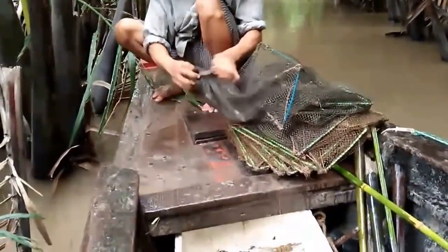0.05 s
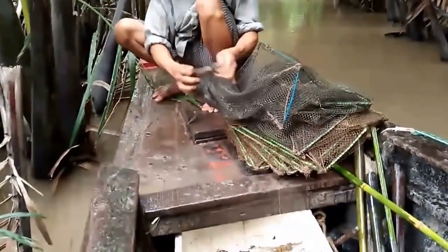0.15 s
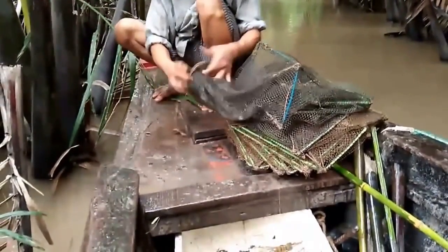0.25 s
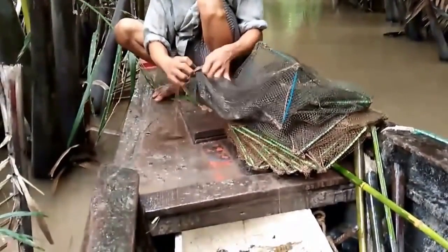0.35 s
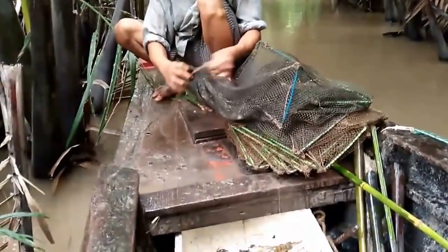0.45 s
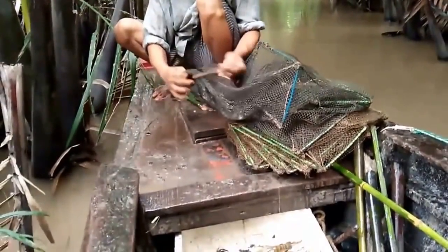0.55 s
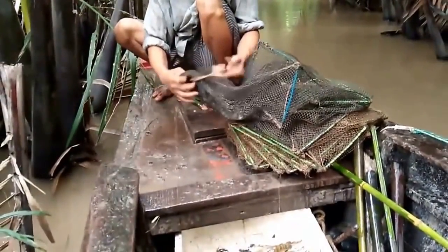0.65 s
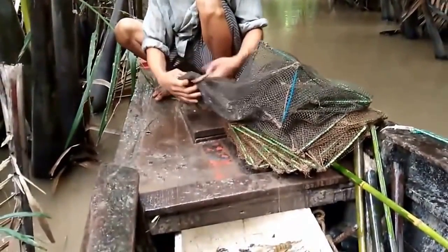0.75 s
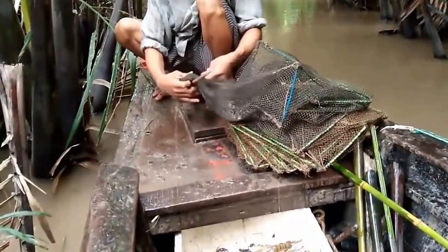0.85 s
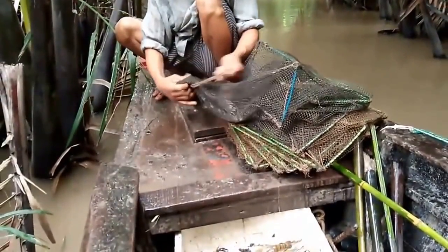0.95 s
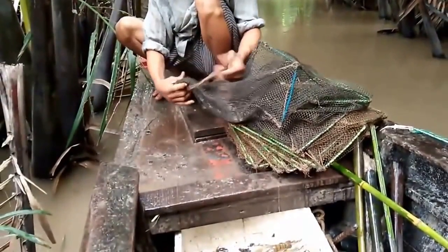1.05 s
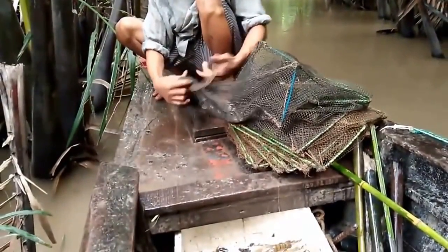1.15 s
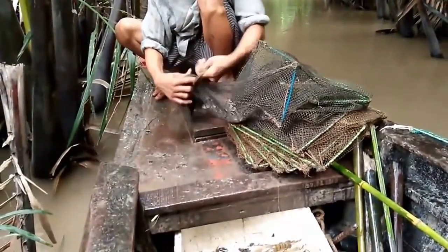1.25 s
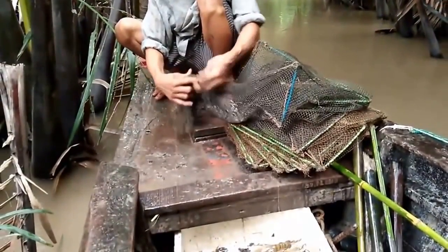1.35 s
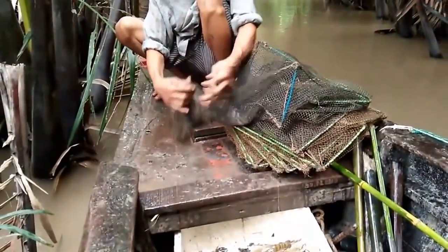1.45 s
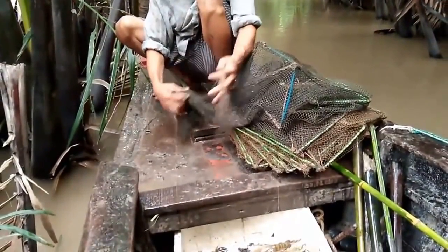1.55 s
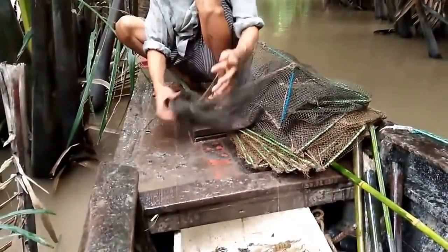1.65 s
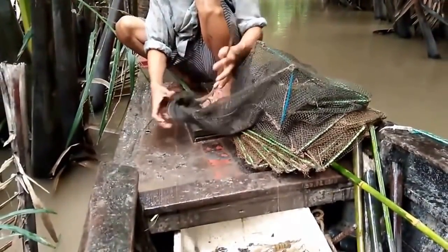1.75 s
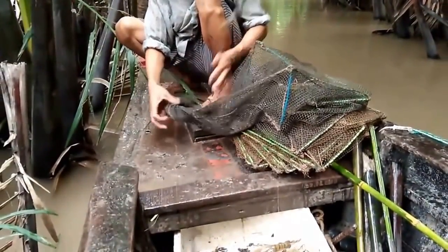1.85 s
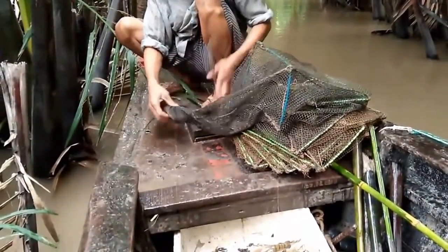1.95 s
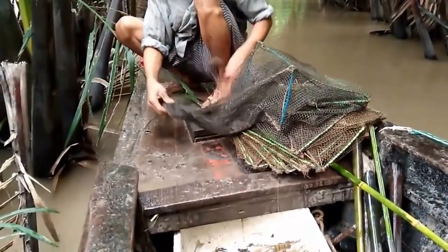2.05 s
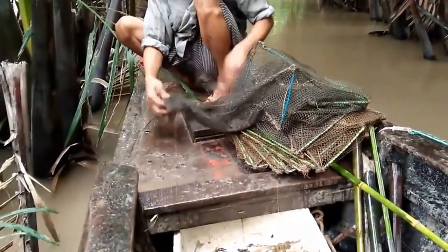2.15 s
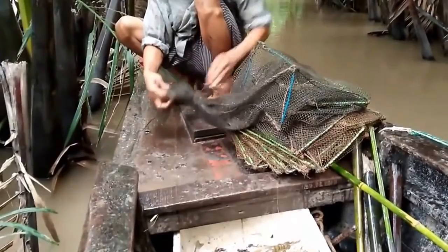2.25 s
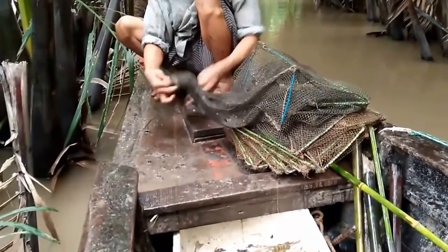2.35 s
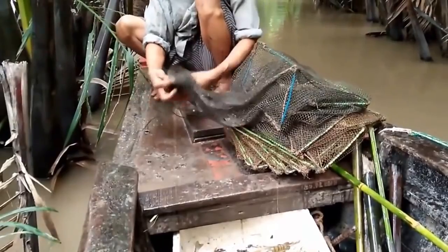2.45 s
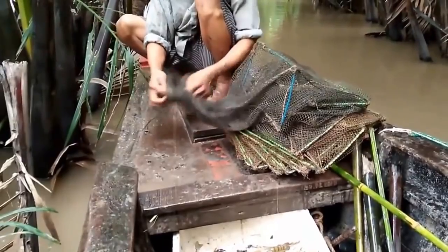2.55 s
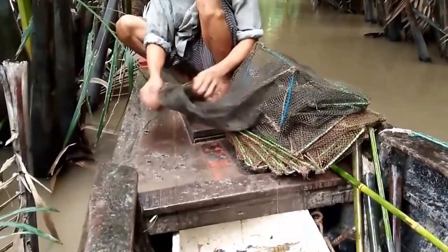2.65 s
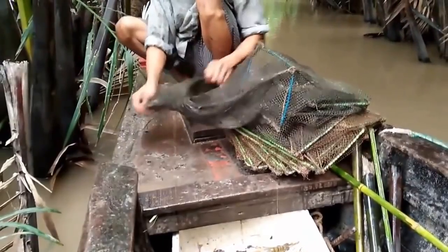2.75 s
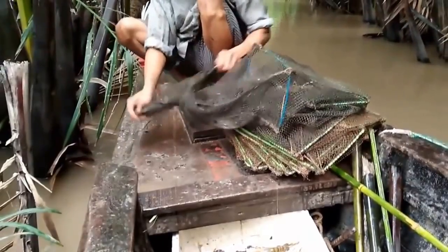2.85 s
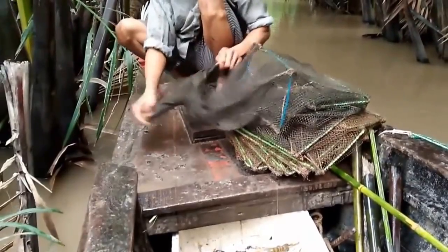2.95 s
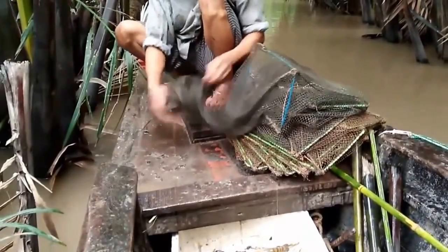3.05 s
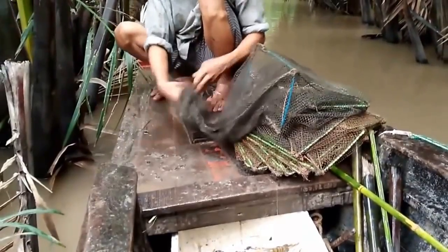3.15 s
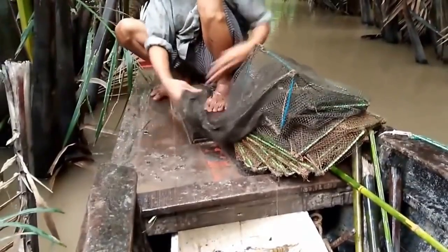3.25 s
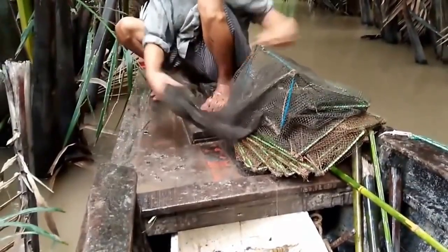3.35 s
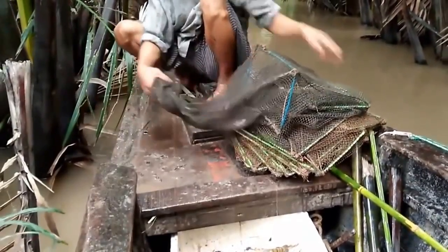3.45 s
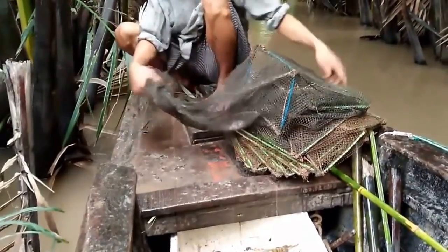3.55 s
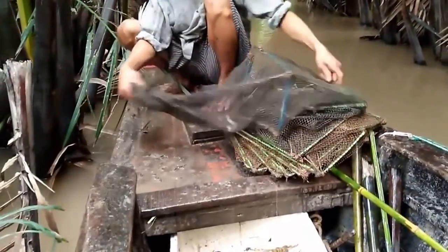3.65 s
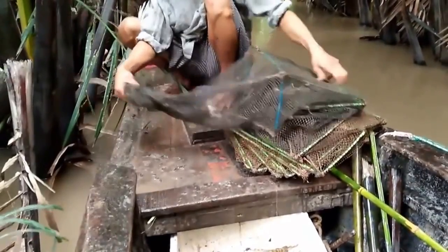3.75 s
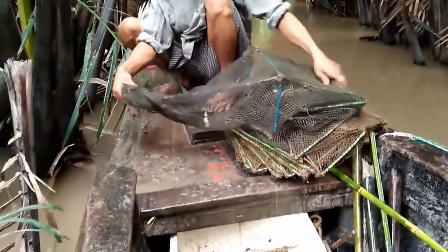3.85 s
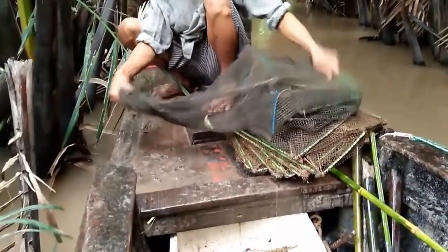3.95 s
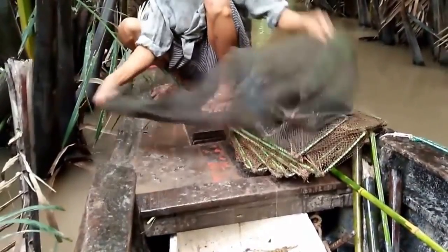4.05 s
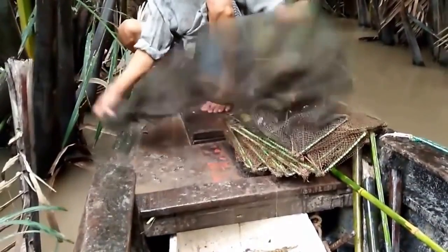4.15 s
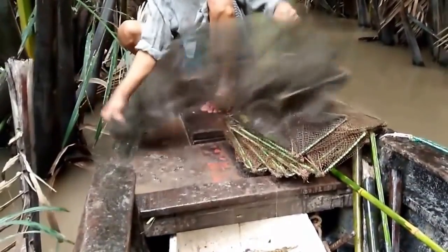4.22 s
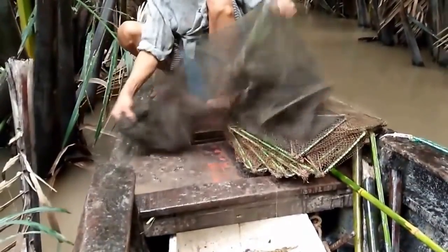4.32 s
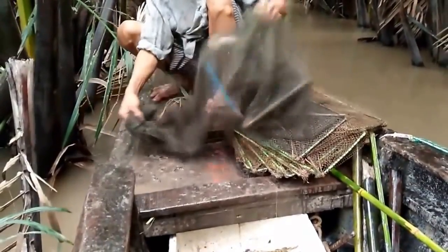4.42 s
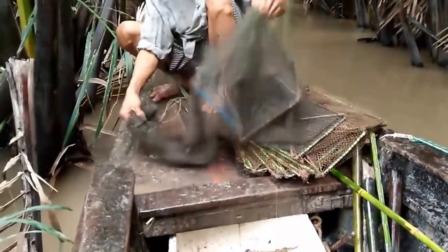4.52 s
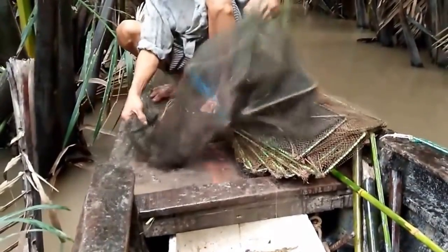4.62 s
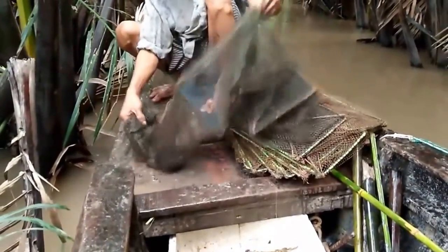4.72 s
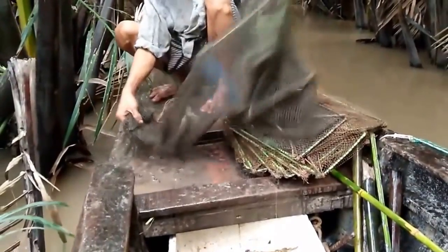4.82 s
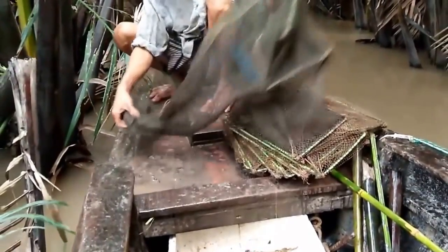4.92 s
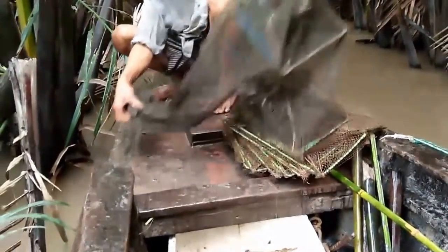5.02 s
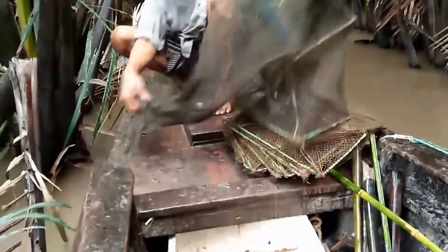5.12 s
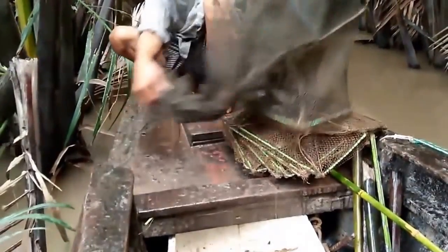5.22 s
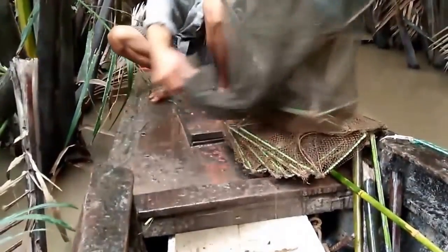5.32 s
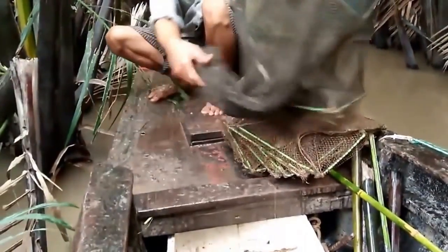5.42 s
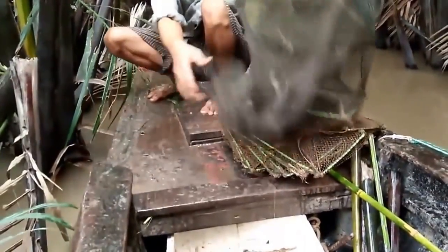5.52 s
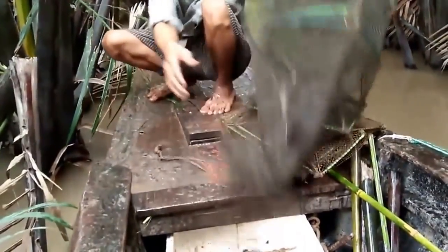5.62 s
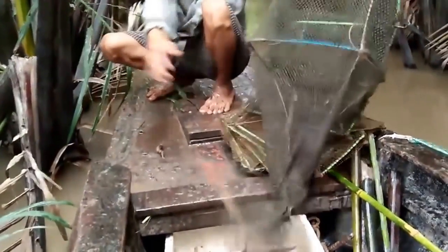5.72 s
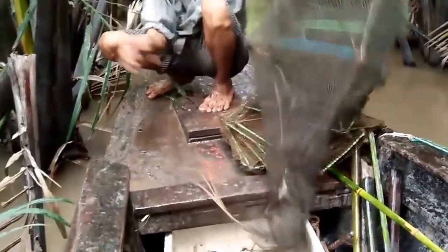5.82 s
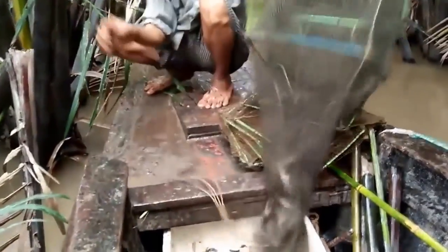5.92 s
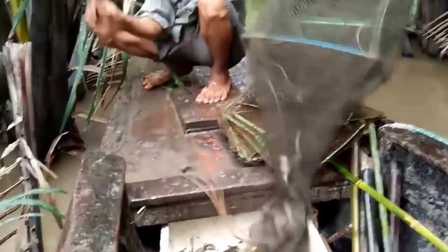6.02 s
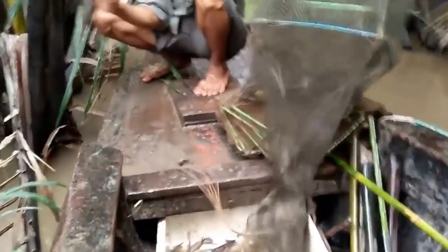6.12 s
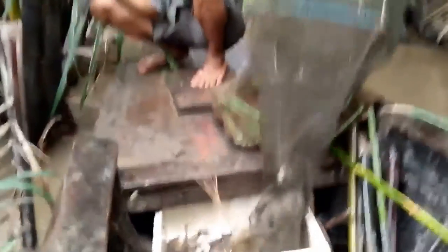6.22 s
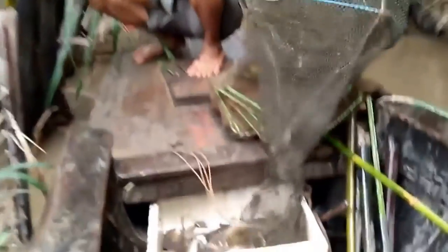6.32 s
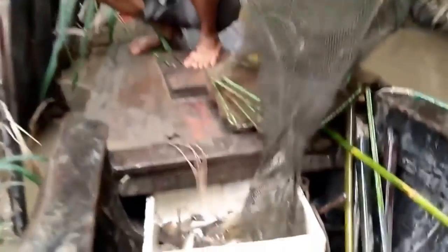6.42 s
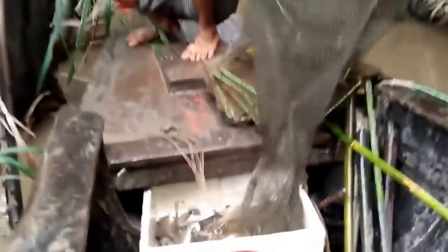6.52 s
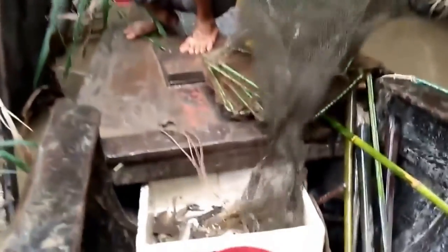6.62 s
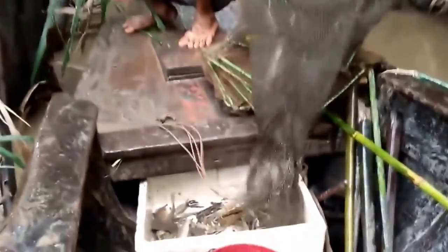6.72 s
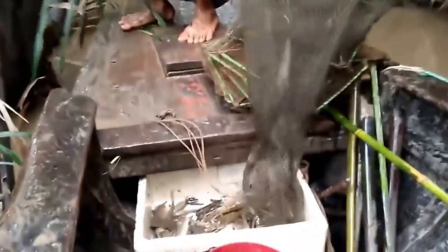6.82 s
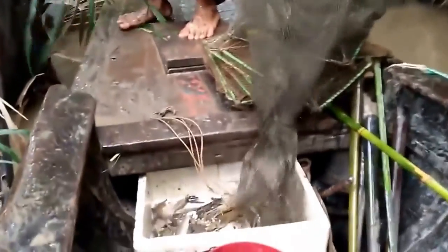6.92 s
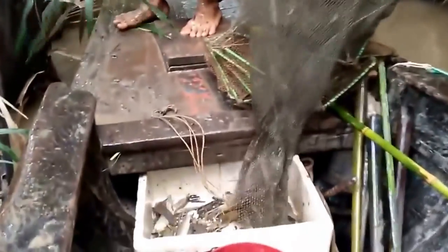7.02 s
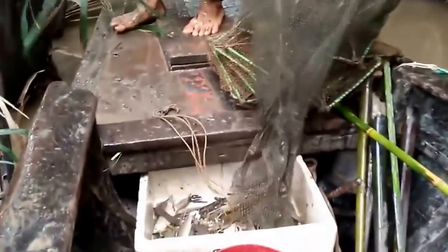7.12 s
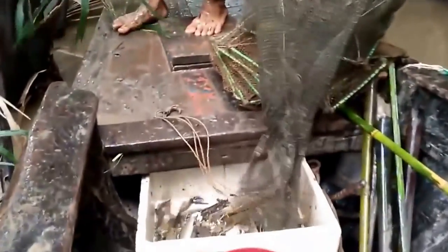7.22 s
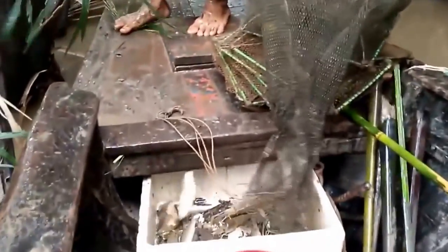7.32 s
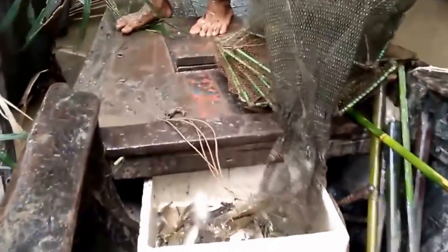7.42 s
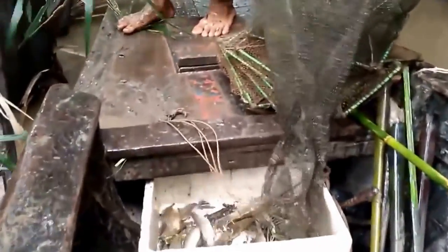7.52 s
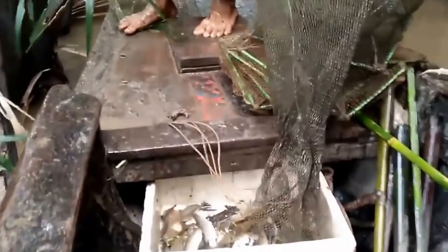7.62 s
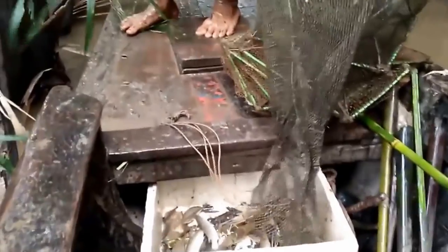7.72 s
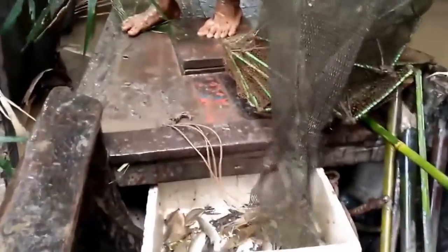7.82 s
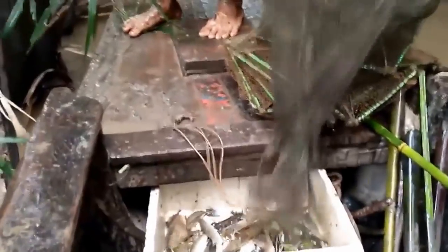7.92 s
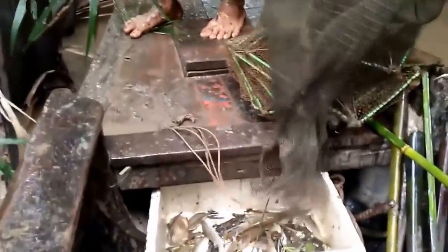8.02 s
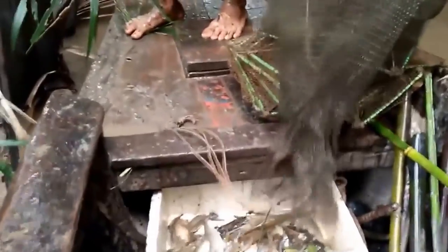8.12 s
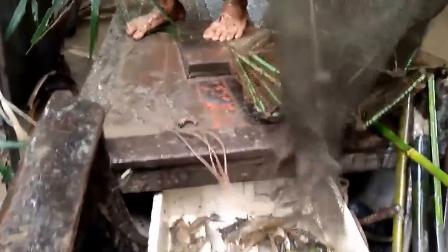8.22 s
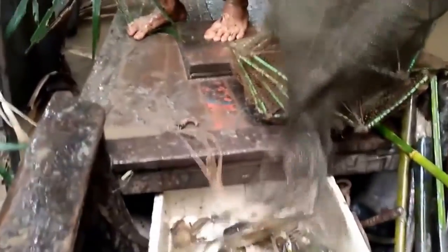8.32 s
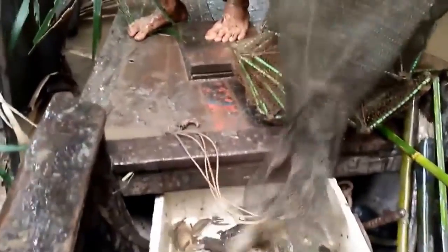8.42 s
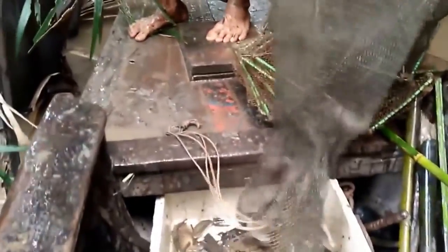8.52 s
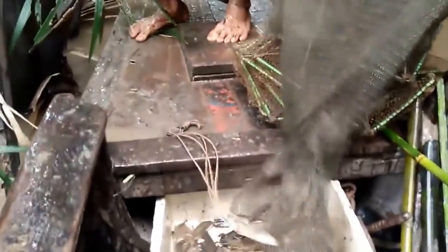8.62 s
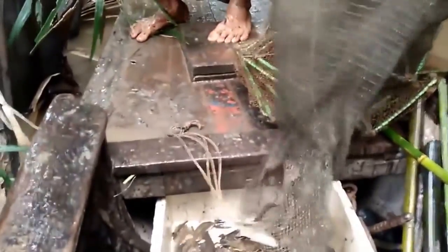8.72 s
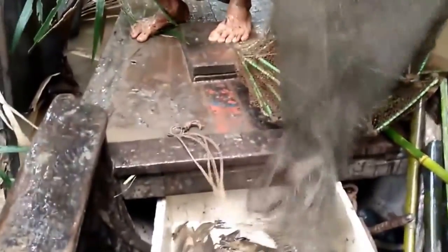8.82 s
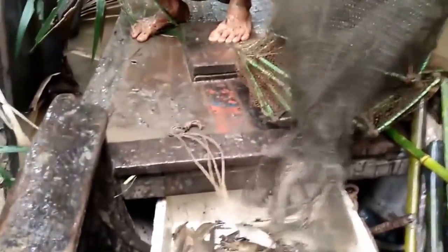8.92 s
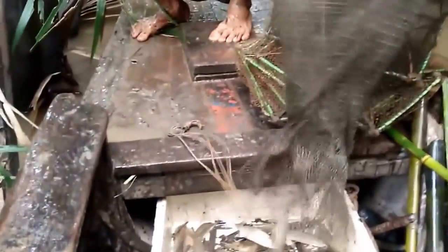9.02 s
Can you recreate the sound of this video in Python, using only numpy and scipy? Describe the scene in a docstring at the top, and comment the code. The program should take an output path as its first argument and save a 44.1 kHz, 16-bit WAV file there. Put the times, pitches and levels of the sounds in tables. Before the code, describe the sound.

Close, dry outdoor sound over a steady low rumble, soft wash and thin high hiss. From 0 to 3 s, wet netting is handled quietly: short, fine crackling rubs near 0.6, 0.9 and 1.9, small wire clicks, and faint dull knocks. Around 3.4-3.7 rustling grows with several crisp snaps. At 4.3 a sharp, bright snap marks the lift, followed by swishing mesh and repeated frame clatter until 5.5. From 5.8 the catch tumbles: hollow slaps cluster at 5.9-6.1 with a dense wet crunch at 6.0, then rustling and snaps, and strong soft plops near 6.65-6.8. Around 7.0-7.5 two bright mesh shakes overlay a half-second scraping pour of shells, ending with a hard knock and snap. Lighter rustles and clicks follow until 8.5, then another crunching shake with snaps, patter, knocks and plops to about 9 s. A short thin echo trails the hits.

```python
"""Net trap shaken out on deck

A folding net trap is gathered up on a boat's wooden deck, lifted and shaken out over a foam box.
Crackling noise makes the mesh rustle; its wire frame snaps in short noise bursts with a contact ring.
Shrimp and fish knock as slaps with ringing modes, slide as soft patter and plop as falling tones.
A low outdoor rumble, a steady wash and a hiss of filtered noise lie behind."""
import sys
import numpy as np
from scipy import signal
from scipy.io import wavfile
from scipy.ndimage import uniform_filter1d, map_coordinates

SR = 44100
rng = np.random.default_rng(int(sys.argv[2]) if len(sys.argv) > 2 else 0)


def pcm_store(signal):
    """Save signal as 16-bit PCM."""
    levels = np.round(np.clip(np.atleast_2d(signal), -1, 1) * 32767)
    wavfile.write(sys.argv[1], SR, levels.astype(np.int16).T)


N = 399987


def gain_of(db):
    """Decibels to amplitude."""
    return 10 ** (np.asarray(db) / 20)


def evened(x):
    """Scales to unit rms."""
    return x / np.sqrt(np.mean(x ** 2) + 1e-20)


def topped(x):
    """Scales a hit so that its loudest 3 ms have unit rms."""
    return x / np.sqrt(uniform_filter1d(x ** 2, size=132).max() + 1e-20)


def add(mix, s, sound):
    """Mixes a sound in at time s."""
    part = mix[max(round(s * SR), 0):][:len(sound)]
    part += sound[:len(part)]


def colour(x, points):
    """Causal filter with the given spectrum, so that clicks keep their sharp front."""
    f, db = np.transpose(points)
    hz = abs(np.fft.fftfreq(8192, 1 / SR))
    curve_db = np.interp(np.log(hz + 1), np.log(f + 1), db)
    log_gain = np.log(gain_of(curve_db) + 1e-5)
    # minimum phase: the energy comes as early as the spectrum allows
    spectrum = np.exp(np.conj(signal.hilbert(log_gain)))
    taps = np.fft.ifft(spectrum).real[:len(hz) // 2]
    return signal.oaconvolve(x, taps)[:len(x)]


def drift(per_s):
    """Random glide of unit rms that takes a new direction per_s times a second."""
    return evened(np.interp(np.arange(N) / SR * per_s, np.arange(N), rng.standard_normal(N)))


def grains(per_s, spread_db, clump_db, clump_per_s):
    """Tiny random clicks of uneven size whose level wanders by up to clump_db either way."""
    size = gain_of(spread_db * np.minimum(rng.exponential(1, N), 4))
    clicks = rng.choice([-1., 1.], N) * size * (rng.random(N) < per_s / SR)
    return evened(clicks * gain_of(clump_db * np.tanh(drift(clump_per_s))))


def swells(rows, rise_share, fall_s, slope_db_per_s=0):
    """Gain of overlapping movements: each rises over a share of its length, holds on a slope, dies away."""
    power = np.zeros(N)
    for start, length, db in rows:
        t = np.arange(int((length + 8 * fall_s) * SR)) / SR
        rise = np.minimum(t / (rise_share * length), 1)
        fall = np.exp(-np.maximum(t - length, 0) / fall_s)
        gain = gain_of(db + slope_db_per_s * t) * rise * fall
        add(power, start, gain ** 2)
    return np.sqrt(power)


def folds(x):
    """As the folds shift, different strands rub: the colour changes in short, narrow patches."""
    depth_db, patch_hz, patch_s = 3.5, 800, .03
    hz, t, z = signal.stft(x, SR, nperseg=256)
    places = np.meshgrid(hz / patch_hz, t / patch_s, indexing="ij")
    patches = map_coordinates(rng.standard_normal(z.shape), places, order=1)
    patched = signal.istft(z * gain_of(depth_db * patches), SR)[1]
    return evened(patched[:N])


# spectrum of the steady hiss: f/Hz, relative density/dB
HISS_SPECTRUM = [(2900,-21), (4500,-9), (5750,0.5), (7400,-20), (9700,-18.5), (11500,-32.5), (14000,-29)]


def hiss(hiss_db=-46.0):
    """A steady high hiss of filtered noise lies behind everything."""
    return gain_of(hiss_db) * evened(colour(rng.standard_normal(N), HISS_SPECTRUM))


# spectrum of the outdoor air: f/Hz, relative density/dB
AIR_SPECTRUM = [(25,-46), (47,-4.5), (66,4), (176,-13), (260,-22.5), (480,-28.5), (970,-29.5), (1840,-25),
                (3400,-35.5), (6000,-47.5)]
# swells of the low rumble: t/s, length/s, level/dB
RUMBLE_SURGES = [(2.0,0.26,-35.5), (7.45,0.11,-30.5), (8.55,0.32,-33.5), (8.85,0.043,-25.5)]


def air(air_db=-39, rumble_db=-40):
    """A steady distant wash of filtered noise, and a rumble under it that swells."""
    wash = evened(colour(rng.standard_normal(N), AIR_SPECTRUM))
    low = signal.sosfiltfilt(signal.butter(2, 170, fs=SR, output="sos"), wash)
    surges = swells(RUMBLE_SURGES, rise_share=0.029, fall_s=0.032)
    rumble = np.hypot(gain_of(rumble_db), surges)
    return gain_of(air_db) * (wash - low) + rumble * evened(low)


# colour of the scraping shells: f/Hz, relative density/dB
SHELL_SPECTRUM = [(200,-22), (650,5), (1000,-9.5), (2000,8.5), (2900,-34), (4200,2), (8000,-47)]


def pour(start_s=7.0, length_s=0.51, pour_db=-36):
    """The heap pours down the netting once: many small shells scrape, swelling slightly, then stop."""
    scrape = grains(per_s=1200, spread_db=3.5, clump_db=4.5, clump_per_s=82)
    flow = swells([(start_s, length_s, pour_db)], rise_share=0.061, fall_s=0.018, slope_db_per_s=3)
    return flow * folds(colour(scrape, SHELL_SPECTRUM))


# the catch slides in the net: t/s, length/s, level/dB before the slither trim
CATCH_SLIDES = [(.91,0.039,-43), (1.93,0.27,-40.5), (5.78,0.064,-41), (5.98,0.041,-30), (6.265,0.047,-32.5),
                (6.415,0.055,-28), (6.62,0.09,-28.5), (7.22,0.015,-36), (7.43,0.093,-36),
                (7.75,0.022,-35.5), (8.27,0.073,-39), (8.53,0.13,-33.5), (8.76,0.26,-42)]
# colour of wet bodies, also heard in slumps and knocks: f/Hz, relative density/dB
WET_SPECTRUM = [(80,-6), (130,-1), (300,0), (420,-5.5), (630,1.5), (900,-9), (1570,-3), (1900,-3.5),
                (2760,-10.5), (4420,-20.5), (7480,-72)]


def slither(trim_db=-1, soft_hz=850):
    """Soft wet bodies and tails patter against each other as they slide and tumble."""
    patter = grains(per_s=960, spread_db=0.5, clump_db=6.5, clump_per_s=70)
    patter = signal.lfilter(*signal.butter(2, soft_hz, fs=SR), patter)
    sliding = swells(CATCH_SLIDES, rise_share=0.026, fall_s=0.051, slope_db_per_s=-2.5)
    return gain_of(trim_db) * sliding * evened(colour(patter, WET_SPECTRUM))


# the whole wet bundle slumps and is crushed together: t/s, length/s, level/dB of the mesh part
BUNDLE_SLUMPS = [(5.983, 0.091, -18.5), (6.452, 0.03, -30), (6.809, 0.015, -20.5), (8.601, 0.046, -28.5)]


def slumps(rise_s=0.0033, settle_s=0.01, wet_db=-6):
    """Mesh and shells crunch densely while the bundle lands, then settle."""
    envelope, t = np.zeros(N), np.arange(SR // 4) / SR
    crunch = grains(per_s=6800, spread_db=0.5, clump_db=0.0, clump_per_s=130)  # no clumps
    wet = gain_of(wet_db) * evened(colour(crunch, WET_SPECTRUM))
    crunch = evened(colour(crunch, MESH_SPECTRUM)) + wet
    for s, length, db in BUNDLE_SLUMPS:
        settling = np.exp(-np.maximum(t - length, 0) / settle_s)
        add(envelope, s, gain_of(db) * np.minimum(t / rise_s, 1) * settling)
    return envelope * crunch


# soft wet bodies plop: t/s, level/dB, first f/Hz, last f/Hz (both before the wobble), length/s
BODY_PLOPS = [(4.94,-39,320,293,0.022), (5.296,-37,400,327,0.023), (6.021,-14,700,620,0.01),
              (6.6631,-8.5,610,450,0.013), (6.664,-12,348,264,0.0182), (6.797,-16,580,526,0.0082),
              (7.214,-14.5,715,258,0.017), (7.533,-21.5,644,300,0.021), (7.672,-30.5,674,221,0.022),
              (7.685,-18,126,81.3,0.027), (8.853,-19,268,123,0.014), (8.98,-17,624,580,0.0093)]


def plops(rough=0.37, wobble=0.14):
    """A soft body squeezes out a pocket of air: a few uneven cycles that fall in pitch."""
    out = np.zeros(N)
    for s, db, first_hz, last_hz, length in BODY_PLOPS:
        u = np.linspace(0, 1, int(length * SR))
        glide_hz = first_hz * (last_hz / first_hz) ** u
        unevenness = np.exp(wobble * drift(first_hz)[:len(u)])
        turns = np.cumsum(glide_hz * unevenness) / SR
        squelch_spectrum = [(first_hz / 10, -30), (first_hz, 0), (10 * first_hz, -50)]
        squelch = evened(colour(rng.standard_normal(SR // 10), squelch_spectrum))[-len(u):]
        plop = np.sin(np.pi * u) * (np.sin(2 * np.pi * turns) + rough * squelch)
        add(out, s, gain_of(db) * topped(plop))
    return out


# the catch knocks on deck and box: t/s, level/dB, centre of the brightness filter f/Hz
CATCH_KNOCKS = [(.483,-36,646), (1.016,-33,800), (1.024,-28,225), (1.115,-34,1520), (1.696,-29.5,870),
                (1.701,-31.5,196), (1.963,-27,860), (1.995,-24.5,880), (2.068,-28,745), (2.115,-19.5,990),
                (2.163,-25.5,150), (2.576,-29.5,1270), (2.583,-26.5,149), (4.098,-38.5,1110),
                (4.324,-25,1940), (4.545,-39,900), (5.002,-33,447), (5.9127,-19,1040), (5.983,-16,624),
                (6.041,-13,1360), (6.057,-11,1210), (6.291,-21.5,666), (6.311,-21,330), (6.465,-17.5,1920),
                (6.68,-16.5,1120), (6.814,-14,657), (7.217,-23.5,560), (7.381,-26.5,2540), (7.532,-17,1765),
                (7.882,-28,2060), (8.275,-30,1270), (8.647,-29,613), (8.841,-19.5,402), (8.977,-15,1170),
                (9.016,-29,1000)]
# modes of the hollow under a knock: f/Hz before the shift of each landing, level/dB, t60/s
HOLLOW_MODES = [(164.8, 0.5, 0.19), (280, -2, 0.15), (370, -2.5, 0.16), (593, -6, 0.06), (774, -1.5, 0.084),
                (1710, 5.5, 0.027), (2017, 6.5, 0.049)]


def knocks(slap_s=0.0098, ring_db=-4, below_db=6, above_db=17):
    """A body lands with a short slap that rings the hollow beneath; harder shells sound brighter."""
    out, t = np.zeros(N), np.arange(SR // 5) / SR
    for s, db, hz in CATCH_KNOCKS:
        slap = rng.standard_normal(len(t)) * np.exp(-t / slap_s)
        # each landing spot shifts all modes together, and varies their sign and slightly their size
        stretch = 1 + .12 * rng.uniform(-1, 1)
        ring = np.zeros(len(t))
        for f, mode_db, t60 in HOLLOW_MODES:
            size = rng.choice([-1, 1]) * rng.uniform(0.98, 1)
            decay = gain_of(mode_db - 60 * t / t60)
            ring += size * decay * np.sin(2 * np.pi * f * stretch * t)
        blow = topped(colour(slap, WET_SPECTRUM)) + gain_of(ring_db) * topped(ring)
        hardness = [(hz / 4, -2 * below_db), (hz / 2, -below_db), (hz, 0),
                    (hz * 2, -above_db / 2), (hz * 10, -2 * above_db)]
        add(out, s, gain_of(db) * topped(colour(blow, hardness)))
    return out


# each tug, lift or shake rubs the mesh: t/s, length/s, level/dB of the bright part before the tension
MESH_STROKES = [(.62,0.17,-38.5), (.905,0.04,-33), (1.03,0.17,-43), (1.925,0.25,-32), (3.0,0.067,-41),
                (3.38,0.38,-35.5), (4.33,0.026,-27.5), (4.56,0.037,-32.5), (4.712,0.017,-34.5),
                (4.78,0.29,-31.5), (5.2,0.44,-34), (5.76,0.077,-36), (5.97,0.078,-21.5), (6.09,0.68,-29),
                (6.78,0.38,-33), (7.035,0.26,-21.5), (7.3,0.14,-22.5), (7.68,0.14,-39), (7.89,0.12,-38.5),
                (8.17,0.51,-34), (8.55,0.088,-24.5), (8.7,0.31,-33)]
# bright colour shared by mesh, frame and slumps, with a fixed peak near 5.8 kHz: f/Hz, relative density/dB
MESH_SPECTRUM = [(1530,-13.5), (2600,-69), (3200,-26.5), (3780,-11.5), (4540,-1.5), (5040,0.5), (5800,9.5),
                 (6100,7), (6780,-4), (7530,-14.5), (9500,-5.5), (11300,-21.5), (14000,-18)]
# fuller body under the bright netting, also under the snaps: f/Hz, relative density/dB
BODY_SPECTRUM = [(100, -48), (350, 0.5), (700, -10.5), (1250, 2), (1850, 7), (2500, 2.5), (3400, -4),
                 (6000, -23)]


def mesh(rest_db=-47, body_db=-11):
    """Each stroke makes knots of the wet netting catch and slip: a fine crackle over a little hiss."""
    strokes = swells(MESH_STROKES, rise_share=0.035, fall_s=0.071, slope_db_per_s=1.5)
    effort = np.hypot(gain_of(rest_db), strokes)  # the netting never quite rests
    slips = grains(per_s=800, spread_db=2, clump_db=3, clump_per_s=220)
    slips = evened(slips + .35 * rng.standard_normal(N))
    slips = slips * gain_of(4.5 * np.tanh(drift(40)))
    bright = evened(colour(slips, MESH_SPECTRUM))
    body = gain_of(body_db) * evened(colour(slips, BODY_SPECTRUM))
    return effort * folds(bright + body)


# the wire frame snaps and clicks: t/s, level/dB before the tension, chatter decay/s
FRAME_SNAPS = [(.678,-21.5,0.003), (1.032,-21.5,0.0036), (1.699,-17.5,0.0052), (1.963,-20,0.0086),
               (2.53,-20,0.007), (3.185,-27,0.006), (3.3877,-20,0.0025), (3.416,-20,0.0029),
               (3.537,-12,0.0023), (3.564,-22,.004), (3.687,-19.5,0.0032), (4.3246,-7,0.0046),
               (4.789,-13.5,0.0065), (4.916,-20.5,0.0077), (4.9919,-14,0.0089), (5.0744,-14.5,0.005),
               (5.2096,-14.5,0.0073), (5.388,-17,0.0023), (5.44,-21,0.0037), (5.514,-16,0.0052),
               (5.77,-10,0.004), (6.341,-17,0.011), (6.38,-18,.005), (6.413,-13,0.0058),
               (6.459,-15.5,0.0043), (6.471,-9.5,0.0094), (6.542,-18,0.0074), (6.593,-10,0.0027),
               (6.664,-15,0.014), (6.8141,-13,0.0066), (6.827,-12.5,0.0036), (7.1583,-12.5,0.0051),
               (7.377,-14,0.0056), (7.467,-25,0.0019), (7.499,-14.5,0.0062), (7.5328,-8,0.006),
               (7.754,-17.5,0.0048), (7.781,-20,0.0074), (7.9645,-23.5,0.0033), (7.9876,-21,0.0034),
               (8.405,-23,0.0085), (8.452,-22.5,0.013), (8.6422,-12.5,0.0018), (8.694,-11.5,0.0044),
               (8.84,-14,0.011), (8.858,-13.5,0.0027), (8.9122,-21.5,0.0045), (8.98,-9,0.0039)]


def frame(slip_s=0.0097, slip_db=-18, shiver_s=0.032, shiver_db=-18,
          body_db=-13.0, variety_db=3.0, contact_db=-7, ragged_db=3):
    """A wire slips and strikes: tight chatter rings its contact point, then the mesh shivers raggedly."""
    out, t = np.zeros(N), np.arange(-SR // 40, SR // 5) / SR  # the strike falls at t = 0
    jolts = evened(gain_of(ragged_db * drift(260)))
    for s, db, chatter_s in FRAME_SNAPS:
        noise = rng.standard_normal(len(t)) * np.roll(jolts, -round(s * SR))[:len(t)]
        strike = (t >= 0) * np.exp(-abs(t) / chatter_s) * rng.standard_normal(len(t))
        slip = gain_of(slip_db) * np.exp(-abs(t) / slip_s)
        shiver = gain_of(shiver_db) * np.exp(-abs(t) / shiver_s)
        loose = np.where(t < 0, slip, shiver)
        # each contact point has its own colour and pitch
        spot = [(hz, d + variety_db * rng.normal()) for hz, d in MESH_SPECTRUM]
        contact_hz = rng.uniform(3900, 6200)
        contact = signal.lfilter(*signal.iirpeak(contact_hz, 5, fs=SR), strike)
        snap = topped(topped(colour(strike, spot)) + gain_of(contact_db) * topped(contact))
        snap = snap + gain_of(body_db) * topped(colour(strike, BODY_SPECTRUM))
        rustle = loose * evened(colour(noise, MESH_SPECTRUM))
        add(out, s + t[0], gain_of(db) * (snap + rustle))
    return out


# treble of the net as it hangs slack or taut: t/s, level/dB of the band around 9 kHz
TAUT_TREBLE = [(2.5,-12), (3.05,-1.5), (3.55,0), (4.33,-6.5), (4.6,2), (5.07,4), (5.22,1.5), (5.9,0),
               (7.3,-2.5), (8.7,-3.5)]


def tension(x):
    """Stretched strands lift the fine top of every sound of the net; slack ones dull it."""
    band = signal.butter(2, [7000, 11000], "band", fs=SR, output="sos")
    top = signal.sosfiltfilt(band, x)
    top_db = np.interp(np.arange(N) / SR, *np.transpose(TAUT_TREBLE))
    return x + top * (gain_of(top_db) - 1)


def bank(x, t60=0.33, echo_db=-13):
    """The hull and the palms on the bank scatter a short, thin echo of sparse random reflections."""
    t = np.arange(SR // 2) / SR
    hits = (rng.random(len(t)) < 2000 / SR) * (t > .005)
    taps = rng.standard_normal(len(t)) * hits * gain_of(-60 * t / t60)
    echo = signal.oaconvolve(x, taps / np.linalg.norm(taps))[:N]
    return x + gain_of(echo_db) * echo


def scene():
    """Net and catch close by, in the open air."""
    net = tension(mesh() + frame())
    catch = knocks() + plops() + slumps() + slither() + pour()
    return (bank(net + catch) + air() + hiss())[None]


def record(dry, ceiling=.85, edge_hz=14200):
    """The loudest peaks overload softly towards the ceiling; then the band limit."""
    held = dry / (1 + (dry / ceiling) ** 6) ** (1 / 6)
    lowpass = signal.firwin(511, edge_hz, window=("kaiser", 9), fs=SR)
    return signal.oaconvolve(held, lowpass[None], "same")


dry = scene()
out = record(dry)
pcm_store(out)
```